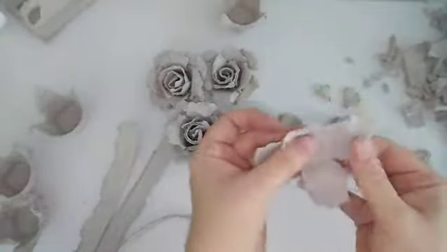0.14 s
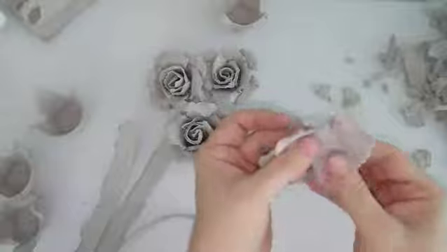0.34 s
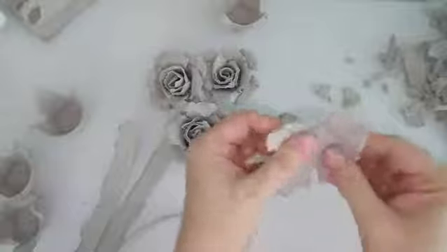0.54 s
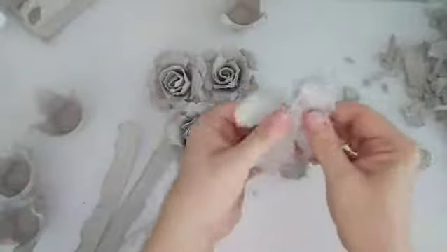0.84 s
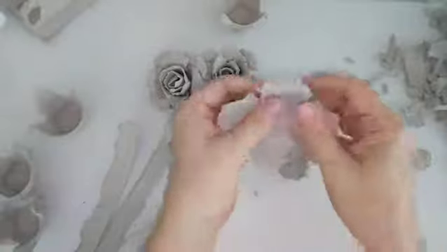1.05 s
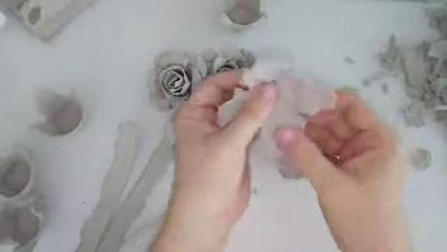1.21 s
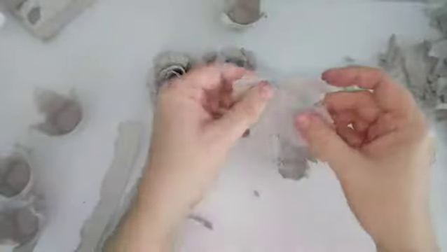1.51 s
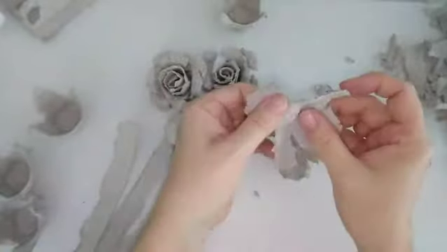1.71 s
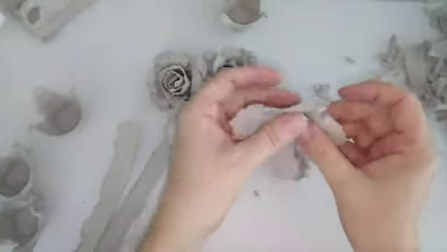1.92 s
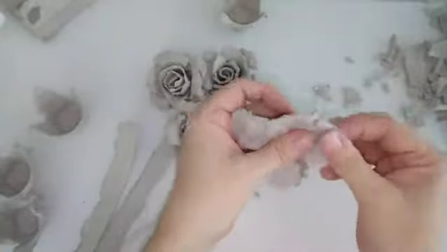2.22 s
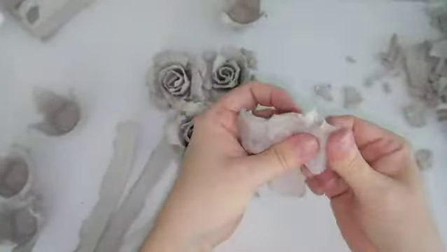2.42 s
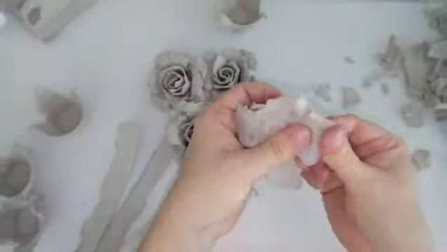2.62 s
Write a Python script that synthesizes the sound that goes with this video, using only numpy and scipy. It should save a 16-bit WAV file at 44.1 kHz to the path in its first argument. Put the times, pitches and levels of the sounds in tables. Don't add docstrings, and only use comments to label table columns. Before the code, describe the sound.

Fingers rub and shape a torn piece of molded pulp card: short hissing rustles, brittle ticks and crackles, low table bumps beneath, thinning toward the end, in a quiet room with a close stereo microphone.

```python
import sys
import numpy as np
from scipy import signal
from scipy.fft import rfft, irfft
from scipy.io import wavfile
from scipy.ndimage import uniform_filter1d

SR = 44100
rng = np.random.default_rng(int(sys.argv[2]) if len(sys.argv) > 2 else 0)


def ratio_of_db(decibels):
    return 10 ** (np.asarray(decibels, float) / 20)


def to_wav(sig):
    pcm = np.clip(np.atleast_2d(sig), -1, 1) * 32767
    pcm = np.round(pcm).astype(np.int16)
    wavfile.write(sys.argv[1], SR, pcm.T)


N = 121275
STEP = 32

# hz, level_db_per_hz
ROOM_COLOUR = [(18, -56.5), (30, 5.5), (267, -8.5), (529, -8.5), (700, -13), (950, -10.5), (1050, -12.5),
               (1660, -17.5), (13000, -37)]
# hz, likeness
ROOM_LIKENESS = [(60, -0.27), (290, -1.22), (640, -0.44), (1500, -0.23), (5000, -0.99)]
ROOM_TONE_DB = -79.5

# peak_s, level_db, rise_s, fall_s (time to lose 20 dB), left_right_db
BUMPS = [(.1, -55.5, 0.086, 0.13, 12), (.153, -50, 0.025, 0.094, 33.5), (.242, -42.5, 0.085, 0.084, -4.5),
         (.308, -40.5, 0.057, 0.032, 5.5), (.41, -49, 0.11, 0.33, 9.5), (.48, -68, 0.12, .1, 19),
         (.555, -50, 0.084, 0.1, 9), (.66, -50.5, 0.016, 0.012, 12), (.87, -51, 0.1, 0.15, -10.5),
         (.985, -47.5, 0.07, 0.061, -10.5), (1.08, -46, 0.085, 0.032, 3.5), (1.135, -47, 0.052, 0.11, -7.5),
         (1.22, -57, 0.094, 0.14, -20.5), (1.345, -54, 0.057, 0.1, -18.5), (1.6, -68, 0.18, 0.15, -12.5),
         (1.678, -51.5, 0.062, 0.098, 3), (1.86, -53, 0.059, 0.15, 20.5), (1.915, -46.5, 0.04, 0.076, -2.5),
         (2.43, -77.5, 0.043, 0.27, -18.5), (2.74, -79, .04, 0.078, 17)]
# hz, level_db_per_hz
TABLE_COLOUR = [(12, -69.5), (20, -42), (58, 0.5), (81, -1.5), (99, -3), (161, -11.5), (200, -29.5),
                (255, -35.5), (500, -38.5), (650, -65), (1100, -120)]
# hz, share
SHAKE_OPPOSED = [(85, 0.074), (130, 0.63), (300, 0.46)]
# start_s, pitch_hz, level_db, t60_s
KNOCKS = [(.07, 1150, -66.5, 0.054), (.39, 1470, -64, 0.077), (.495, 743, -55, 0.063),
          (.575, 992, -76, 0.26), (0.654, 1122, -60.5, .12), (.665, 723, -67.5, 0.1),
          (.74, 858, -62.5, 0.08), (0.876, 380, -65.5, 0.16), (1.079, 774, -52.5, 0.027),
          (1.663, 309, -50.5, 0.071), (0.244, 1064, -64, 0.051), (1.715, 900, -67, .08),
          (1.949, 972, -64.5, 0.079), (1.976, 940, -74, .06)]
KNOCK_RISE_S = 0.008

# peak_s, pitch_hz, level_db, half_length_s
RINGS = [(0.131, 3280, -66, 0.045), (0.26, 3300, -67.5, 0.066), (0.497, 3400, -49.5, 0.048),
         (0.482, 6660, -51.5, 0.09), (0.513, 1400, -68, 0.036), (0.61, 2020, -49, 0.029),
         (0.69, 2060, -60, 0.072), (.25, 6250, -59, .025), (1.128, 2000, -52, 0.004),
         (1.128, 3670, -50, .01), (1.145, 3430, -55, 0.012), (1.411, 3540, -49, 0.038),
         (1.647, 2120, -57.5, 0.059), (1.715, 1760, -65, 0.067), (1.865, 3410, -51, 0.022),
         (2.06, 2390, -67, 0.025), (2.21, 4070, -50.5, 0.02), (2.215, 3070, -54.5, .018),
         (0.964, 2692, -66, 0.015), (2.285, 3000, -68, 0.035)]
RING_Q, RING_CLUMP_DB, RING_FAR_DB = 9.0, 2, -7.5

# peak_s, level_db, rise_s, fall_s (time to lose 20 dB),
# card_body_db
STROKES = [(.005, -58.5, 0.046, 0.4, -2), (.118, -51, 0.053, 0.057, -0.5), (.215, -56, 0.004, 0.15, 24),
           (.244, -40.5, 0.041, 0.048, -4), (.345, -50.5, 0.09, 0.081, -1), (.425, -52, 0.046, 0.17, -5.5),
           (.492, -39, 0.051, 0.067, 2.5), (.6, -57.5, 0.081, 0.73, 19), (.71, -43, 0.13, 0.058, -0.5),
           (.77, -61, 0.042, 0.033, 0.5), (.905, -55, 0.039, 0.062, -10), (.961, -48.5, 0.0088, 0.051, 2.5),
           (1.07, -60, 0.19, 0.4, 4.5), (1.16, -42.5, 0.08, 0.075, 1.5), (1.3, -59.5, 0.012, 0.013, -4),
           (1.342, -49, 0.0073, 0.21, 3), (1.43, -44.5, 0.07, 0.055, 1.5), (1.615, -46, 0.061, 0.13, -2.5),
           (1.71, -59, 0.11, 0.066, 6.5), (1.858, -49.5, 0.012, 0.052, 4.5),
           (1.916, -54.5, 0.015, 0.13, 4.5), (2.145, -49.5, 0.09, 0.14, 6), (2.21, -51, 0.064, 0.046, 15),
           (2.305, -54.5, 0.097, 0.055, 10.5),
           (0.2, -57, 0.0049, 0.0085, 8), (1.822, -64, 0.015, 0.052, -25), (1.841, -56.5, 0.0064, 0.013, 4),
           (1.898, -44.5, 0.012, 0.042, 1.5), (0.859, -63.5, 0.21, 0.068, -36),
           (1.53, -66, 0.033, 0.08, -7.5), (1.79, -65, 0.12, 0.075, -10),
           (1.92, -35.5, 0.0097, 0.0032, 3.5), (2.056, -58.5, 0.0073, 0.046, 4),
           (2.4, -70.5, 0.24, 0.063, 7.5), (2.478, -65, 0.13, 0.095, -26.5),
           (2.69, -51.5, 0.011, 0.034, -5), (2.75, -65, 0.037, 0.026, -2), (.55, -48, 0.062, 0.022, 6)]
GESTURE_CURVE = 1.52
# start_s, peak_db
SNAPS = [
    (.2362, -49.5),
    (1.0799, -25),
    (1.0819, -30.5),
    (1.0933, -37.5),
    (1.8213, -48),
    (1.9155, -46),
    (1.9235, -30),
    (1.9269, -35),
    (1.958, -37.5),
         (0.215, -49), (0.2477, -28), (.4643, -44), (0.4785, -37), (0.488, -44.5), (.494, -25.5),
         (0.505, -38), (.512, -39), (.675, -38), (0.688, -44.5), (0.709, -51), (.721, -46), (1.143, -55.5),
         (1.16, -30.5), (1.158, -44), (1.166, -46), (1.175, -42.5), (1.201, -44), (1.3932, -44),
         (1.598, -59), (1.8416, -56), (1.948, -59), (1.994, -56), (2.097, -52.5)]
SNAP_T60_S, SNAP_DB = 0.0031, 4
GRAINS_PER_S, GRAIN_SPREAD_DB, GRAIN_CAP = 5000, 3, 3.2
GRAIN_SHARE, CLUMP_DB, CLUMP_HZ = 0.62, 1.5, 111
RUB_DB = 1.5

# time_s, pitch_hz
FLAP = [(0, 2310), (0.201, 2620), (.25, 1774), (.42, 3090), (0.491, 1440), (0.558, 1260), (.6, 1750),
        (.8, 1760), (.95, 2380), (1.08, 2040), (1.34, 2566), (1.45, 2180), (1.62, 1740), (1.78, 1580),
        (1.85, 2610), (1.92, 1890), (2.1, 2850), (2.75, 3040)]
FLAP_DB_PER_OCTAVE = 32
BODY_TOP_HZ, PATCH_DB = 5300, 2.4
PORT_LIKENESS = -0.32
REFLECTION_DB, REFLECTION_T60_S = -5, 0.083
# pitch_hz, width_octaves, near_db, far_db
SHADES = [(2360, 0.048, -1.5, -20.5), (4470, 0.21, -0.5, -0.5), (4970, .12, 0, 1.5)]
# hz, level_db_per_hz
NEAR_PORT = [(1500, -18.5), (2100, -12.5), (3200, -12), (6000, -12), (9500, -6.5), (11400, 3),
             (13000, -8.5), (15800, -10)]
# hz, level_db_per_hz
FAR_PORT = [(900, -34.5), (1500, -25.5), (2300, -20.5), (4000, -14), (6500, -10.5), (8500, -20),
            (11000, -23.5), (15500, -31.5)]

# hz, depth_db
SURVIVES = [(300, 56), (900, 46), (1600, 39), (3000, 27), (5000, 21), (7500, 23), (11000, 29), (15500, 32)]
BASS_DRAIN_DB = 8.0
QUIET_UNDER_DB, EASY_DB = 36, 14
CHANCE_DB, WEAK_LINE_DB = 7, 5
HEARING_DB, HEARING_HZ = -110, 12900
JOINT_TOP_HZ = 2200


def at_hz(points, hz):
    table_hz, value = np.transpose(points)
    return np.interp(np.log(np.maximum(hz, 1)), np.log(table_hz), value)


def rms_one(x):
    return x / np.sqrt(np.mean(x ** 2) + 1e-20)


def fill(x):
    return np.interp(np.arange(N), STEP * np.arange(len(x)), x)


def drift(rate_hz):
    r = np.exp(-2 * np.pi * rate_hz * STEP / SR)
    noise = rng.standard_normal(N // STEP + 301)
    wander = signal.lfilter([1], [1, -2 * r, r * r], noise)[300:]
    return fill(rms_one(wander))


def swells(rows):
    t = np.arange(0, N + STEP, STEP) / SR
    power = []
    for peak_s, db, rise_s, fall_s, _ in rows:
        away = np.where(t < peak_s, (peak_s - t) / rise_s, (t - peak_s) / fall_s)
        power.append(ratio_of_db(2 * (db - 20 * away ** GESTURE_CURVE)))
    power = np.array(power) + 1e-30
    total = power.sum(axis=0)
    return fill(np.sqrt(total)), fill(np.array(rows)[:, -1] @ power / total)


def coloured(x, points):
    hz = np.arange(N // 2 + 1) * SR / N
    return irfft(rfft(x) * ratio_of_db(at_hz(points, hz)), N)


def room_tone():
    hz = np.arange(N // 2 + 1) * SR / N
    alike = np.clip(at_hz(ROOM_LIKENESS, hz), -1, 1)
    mid, side = coloured(rng.standard_normal((2, N)), ROOM_COLOUR)
    mid = rfft(rms_one(mid)) * ratio_of_db(ROOM_TONE_DB)
    side = rfft(rms_one(side)) * ratio_of_db(ROOM_TONE_DB)
    side = side * np.sqrt((1 - alike) / np.maximum(1 + alike, 0.1))
    return irfft(np.array([mid + side, mid - side]), N)


def table_shaking():
    level, pan_db = swells(BUMPS)
    near, far = rfft(rng.standard_normal((2, N)))
    opposed = at_hz(SHAKE_OPPOSED, np.arange(N // 2 + 1) * SR / N)
    far = np.sqrt(1 - opposed ** 2) * far - opposed * near
    shake = rms_one(coloured(irfft(np.array([near, far]), N), TABLE_COLOUR)) * ratio_of_db(-2.0)
    return level * shake * ratio_of_db(np.array([pan_db, -pan_db]) / 2)


def hollow_knocks():
    knocks = 0
    for start_s, hz, db, t60_s in KNOCKS:
        t = np.maximum(np.arange(N) / SR - start_s, 0)
        mode = np.sin(2 * np.pi * hz * t) * (1 - np.exp(-t / KNOCK_RISE_S))
        knocks = knocks + ratio_of_db(db - 60 * t / t60_s) * mode
    return knocks * [[3.5], [-1.4]]


def card_rings():
    out, t = 0, np.arange(N) / SR
    for peak_s, hz, db, half_s in RINGS:
        swell = np.exp(-((t - peak_s) / half_s) ** 2)
        drag = rng.standard_normal(N) * swell * ratio_of_db(db + RING_CLUMP_DB * drift(40.0))
        r = np.exp(-np.pi * hz / RING_Q / SR)
        resonance = [1, -2 * r * np.cos(2 * np.pi * hz / SR), r * r]
        tone = signal.lfilter([1, 0, -1], resonance, drag + 1e-18) * np.sqrt(1 - r * r) / 2
        out = out + tone * [[ratio_of_db(rng.normal(0, 2))], [-ratio_of_db(RING_FAR_DB)]]
    return out


def rubbing():
    level, body_db = swells(STROKES)
    size_db = GRAIN_SPREAD_DB * np.minimum(rng.exponential(1, N), GRAIN_CAP)
    sizes = ratio_of_db(size_db) * rng.choice([-1, 1], N)
    grains = rms_one(sizes * (rng.random(N) < GRAINS_PER_S / SR))
    smooth = rng.standard_normal(N)
    drag = np.sqrt(GRAIN_SHARE) * grains + np.sqrt(1 - GRAIN_SHARE) * smooth
    drag = drag * ratio_of_db(CLUMP_DB * drift(CLUMP_HZ))
    out = level * rms_one(drag) * ratio_of_db(RUB_DB)
    t = np.arange(400) / SR
    for start_s, db in SNAPS:
        crack = rng.standard_normal(len(t))
        crack *= 2 / np.abs(crack[:20]).max()
        first = int(start_s * SR)
        out[first:first + len(t)] += ratio_of_db(db + SNAP_DB - 60 * t / SNAP_T60_S) * crack
    return out, body_db


def at_two_ports(rub):
    tail = rng.standard_normal((2, 9000)) * ratio_of_db(-60 * np.arange(9000) / SR / REFLECTION_T60_S)
    tail /= np.linalg.norm(tail, axis=1, keepdims=True)
    other = rub * rng.choice([-1, 1], N)
    far = PORT_LIKENESS * rub + np.sqrt(1 - PORT_LIKENESS ** 2) * other
    pair = np.array([rub, far])
    return pair + ratio_of_db(REFLECTION_DB) * signal.fftconvolve(pair, tail, axes=1)[:, :N]


def case_shading(x):
    octave = np.log2(1 + np.arange(N // 2 + 1) * SR / N)
    shade_db = 0
    for hz, wide, *port_db in SHADES:
        shade_db = shade_db + np.outer(port_db, np.exp(-((octave - np.log2(hz)) / wide) ** 2))
    return irfft(rfft(x) * ratio_of_db(shade_db), N)


def card():
    rub, body_db = rubbing()
    pair = at_two_ports(rub)
    out, edges = 0, 700 * 2 ** np.arange(0, 4.7, 1 / 4)
    flap_hz = np.interp(np.arange(N) / SR, *np.transpose(FLAP))
    for k, (low, high) in enumerate(zip(edges, edges[1:])):
        centre = np.sqrt(low * high)
        body_weight = 1 / (1 + (centre / BODY_TOP_HZ) ** 4)
        flap_loss_db = FLAP_DB_PER_OCTAVE * np.clip(np.log2(flap_hz / centre), 0, 0.9)
        gain_db = body_weight * body_db - flap_loss_db + PATCH_DB * drift(8.0)
        band_pass = signal.butter(3, [low, high], "band", fs=SR, output="sos")
        out = out + (-1) ** k * signal.sosfilt(band_pass, pair) * ratio_of_db(gain_db)
    near, far = case_shading(out)
    return np.array([coloured(near, NEAR_PORT), coloured(far, FAR_PORT)]) * ratio_of_db(9.0)


def scene():
    return room_tone() + table_shaking() + hollow_knocks() + card_rings() + card()


def joint(z, hz):
    turned = np.array([z[0] + z[1], z[0] - z[1]]) / np.sqrt(2)
    return np.where((hz < JOINT_TOP_HZ)[:, None], turned, z)


def silence_faint(x):
    hz, _, z = signal.stft(x, SR, "cosine", 2048, 1024)
    z = joint(z, hz)
    band = np.unique((np.log(1 + hz / 3000) * 30).astype(int), return_inverse=True)[1]
    member = band == np.arange(band.max() + 1)[:, None]
    member = member / member.sum(axis=1, keepdims=True)
    db = 10 * np.log10(member @ np.abs(z) ** 2 + 1e-30)
    centre = member @ hz
    high = centre > 2000
    loudest = db[:, high].max(axis=(0, 1))
    shaken = uniform_filter1d(db[:, :2].max(axis=(0, 1)), size=5) - BASS_DRAIN_DB
    loudest = np.where(high[:, None], np.maximum(loudest, shaken), loudest)
    chance = uniform_filter1d(rng.standard_normal(db.shape), size=3, axis=2) * np.sqrt(3) * CHANCE_DB
    limit_db = loudest - at_hz(SURVIVES, centre)[:, None] + chance
    limit_db -= EASY_DB * (loudest < loudest.max() - QUIET_UNDER_DB)
    keep = db > limit_db
    keep &= (db > HEARING_DB) | (centre < HEARING_HZ)[:, None]
    strong_line = np.abs(z) > ratio_of_db(limit_db[:, band] + WEAK_LINE_DB)
    kept = joint(z * keep[:, band] * strong_line, hz)
    return signal.istft(kept, SR, "cosine", 2048, 1024)[1][:, :N]


def low_pass(x):
    return signal.sosfilt(signal.butter(12, 15830, fs=SR, output="sos"), x)


def record(dry):
    mix = silence_faint(dry)
    return low_pass(mix)


dry = scene()
out = record(dry)
to_wav(out)
```